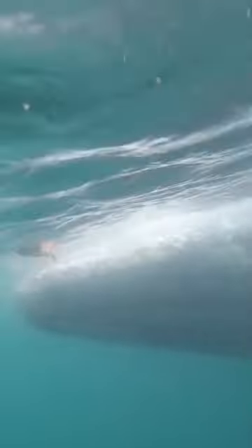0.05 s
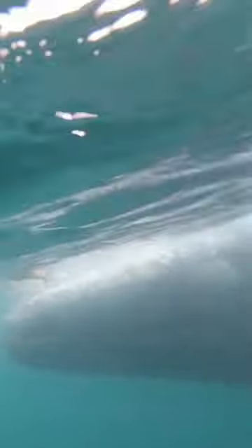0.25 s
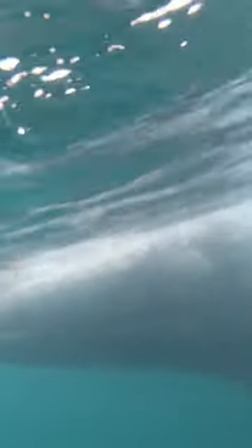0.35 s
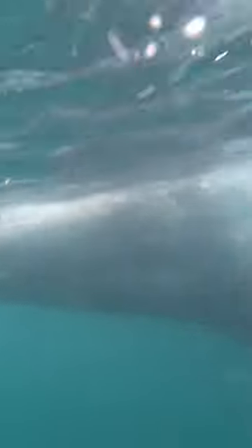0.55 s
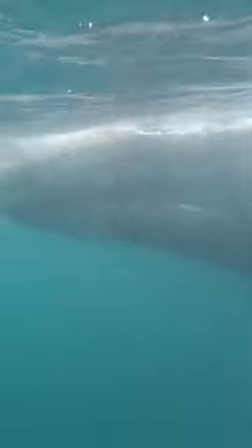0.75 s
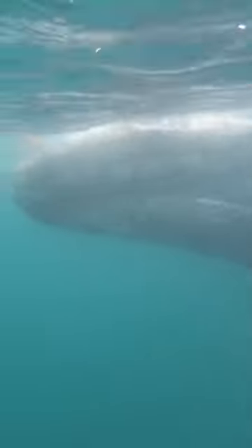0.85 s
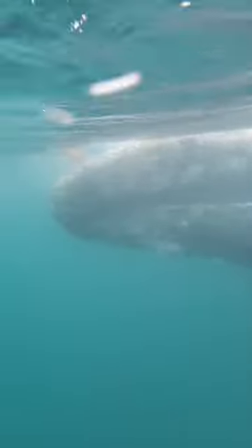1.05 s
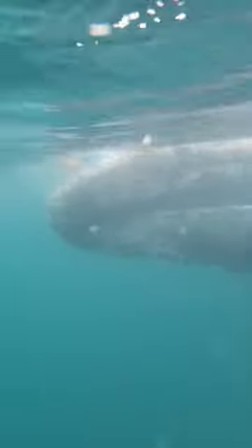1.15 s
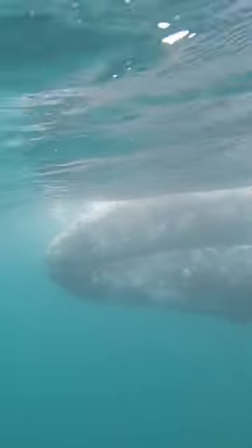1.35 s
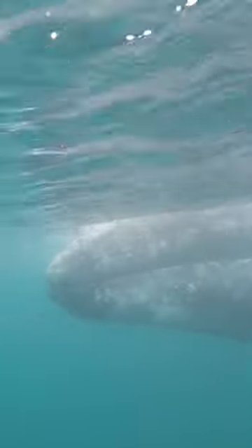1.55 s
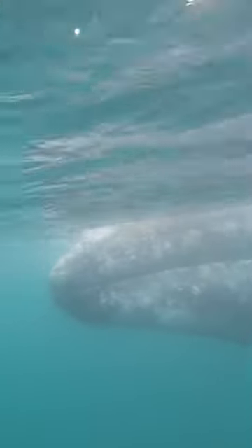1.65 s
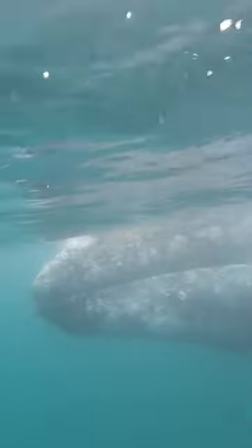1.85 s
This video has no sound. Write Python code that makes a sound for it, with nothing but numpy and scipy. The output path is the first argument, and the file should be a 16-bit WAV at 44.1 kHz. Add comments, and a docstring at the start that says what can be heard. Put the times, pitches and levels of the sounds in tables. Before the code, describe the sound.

Water gurgles and splashes against a sealed camera just below the sea surface. A faint low rumble opens; at 0.25 s a deep gulp drops in pitch. From 0.38 to 0.65 s a dense burst of bubbles pops, fizzes and crackles, with a rising bubble note. Sharp ticks follow at 0.8 and 0.9 s, among deep blubs until 1.3 s, then quiet muffled rumble with faint wash returning near 1.7 s.

```python
"""A low rumble and a muffled wash from the surface (shaped noise) surround a camera held just under the sea.
A wavelet closes over it: pockets of air gulp and wobble (fading sine tones that bend in pitch), small bubbles
ping, fizz and crackle (short tones and clicks) and leave a ringing cloud (noise in narrow resonances).
One large bubble rings on, mostly rising in pitch, while drops tick on the housing (clicks through its
resonances); a thin high sizzle (noise in narrow bands) surrounds two sharp ticks."""
import sys
import numpy as np
from scipy import signal
from scipy.fft import rfft, irfft
from scipy.io import wavfile
from scipy.ndimage import uniform_filter1d

SR = 44100
rng = np.random.default_rng(int(sys.argv[2]) if len(sys.argv) > 2 else 0)


def wav_record(signal):
    """Record a signal, one row per channel, as 16-bit PCM in the file named by sys.argv[1]."""
    frames = np.transpose(np.atleast_2d(signal))
    bounded = np.clip(frames, -1, 1)
    # unit amplitude maps onto the largest positive 16-bit level
    quanta = np.round(bounded * 32767).astype(np.int16)
    wavfile.write(sys.argv[1], SR, quanta)


N = 83790  # length in samples


def undb(db):
    """Turn decibels into a gain."""
    return 10 ** (np.asarray(db) / 20)


def unit(x):
    """Scale a sound to an average (rms) strength of 1."""
    return x / np.sqrt(np.mean(x ** 2))


def curve(rows, axis=1):
    """Join one column of a timed table by straight lines."""
    rows = np.array(rows)
    return np.interp(np.arange(N) / SR, rows[:, 0], rows[:, axis])


def colour(x, points):
    """Shape the spectrum through (Hz, dB) points, with no sound ahead of its cause (minimum phase)."""
    size = 2 * N
    points = np.array(points)
    hz = np.maximum(np.arange(size // 2 + 1) * SR / size, 1)
    db = np.interp(np.log(hz), np.log(points[:, 0]), points[:, 1])
    # fold the cepstrum onto positive times
    cepstrum = irfft(np.log(undb(db)))
    cepstrum[1:size // 2] *= 2
    cepstrum[size // 2 + 1:] = 0
    return irfft(rfft(x, size) * np.exp(rfft(cepstrum)))[:N]


def band(x, hz, width):
    """Pass a sound through one resonance with gain 1 at its centre."""
    g, k = np.tan(np.pi * hz / SR), width / hz
    top = [g * k, 0, -g * k]
    bottom = [1 + g * k + g * g, 2 * (g * g - 1), 1 - g * k + g * g]
    return signal.lfilter(top, bottom, x + 1e-18)


def walk(rate):
    """Slow random drift of spread 1, from random steps (rate per second) smoothed twice."""
    k = int(SR / rate)
    steps = np.repeat(rng.standard_normal(N // k + 1), k)
    smooth = uniform_filter1d(uniform_filter1d(steps, k), k)
    return unit(smooth[:N])


def add(out, start, sound):
    """Mix a sound in at its time."""
    i = int(start * SR)
    out[i:i + len(sound)] += sound[:N - i]


def ring(t, hz, t60, onset):
    """An air volume swells into pulsation and dies away, by 60 dB in t60 seconds."""
    tone = np.sin(2 * np.pi * np.cumsum(hz) / SR)
    swell = (1 - np.exp(-t / onset)) ** 2
    fade = np.exp(-np.log(1000) * t / t60)
    return tone * swell * fade


def gliding_bubbles(rows):
    """Each bubble or pocket rings at the pitch of its size and glides as it moves."""
    onset_cycles = 0.36
    out = np.zeros(N)
    for start, hz, db, t60, glide in rows:
        t = np.arange(int(2 * t60 * SR)) / SR
        pitch = hz * 2 ** (glide * t / t60)
        add(out, start, undb(db) * ring(t, pitch, t60, onset_cycles / hz))
    return out


def noise_bands(modes, level):
    """Noise through narrow resonances, each filtered twice, with a drawn loudness."""
    lines = np.zeros(N)
    for hz, width, db in modes:
        noise = rng.standard_normal(N)
        lines += undb(db) * unit(band(band(noise, hz, width), hz, 2 * width))
    return unit(lines) * undb(curve(level))


def water():
    """Flow rumbles and churns on the case; the surface washes and hisses above in uneven surges."""
    # Loudness of each layer. Each row: time in seconds, level in dB (wash and hiss: before surging).
    rumble_level = [(0, -32.5), (.12, -31.5), (0.229, -21.5), (.285, -32), (.32, -21.5), (.41, -20),
                    (.47, -28.5), (.52, -20.5), (.56, -20), (.68, -26), (.88, -23.5), (1.0, -26),
                    (1.131, -39.5), (1.27, -39), (1.4, -45), (1.65, -31.5), (1.9, -36)]
    churn_level = [(.17, -57), (.215, -35.5), (.27, -46.5), (.34, -31), (.40, -40.5), (.47, -19),
                   (.53, -37.5), (.65, -39.5), (0.679, -57.5), (.80, -77)]
    wash_level = [(0, -39.5), (.2, -50.5), (0.349, -58.5), (0.699, -51.5), (0.899, -58), (.96, -44),
                  (1.049, -53.5), (1.15, -54.5), (1.4, -53.5), (1.55, -49), (1.63, -45), (1.68, -41),
                  (1.71, -48.5), (1.80, -42.5), (1.87, -40), (1.9, -36)]
    hiss_level = [(0, -55), (0.199, -58.5), (.7, -67.5), (1.15, -72.5), (1.38, -71), (1.55, -66),
                  (1.64, -58), (1.70, -60.5), (1.75, -59.5), (1.83, -56.5), (1.9, -55.5)]
    # Balance of low and high sound in each layer. Each row: frequency in Hz, relative level in dB.
    rumble_colour = [(15, -1), (30, -2.5), (50, -1), (80, -6.5), (130, -2.5), (190, -13), (300, -28),
                     (600, -46), (2000, -76), (10000, -110)]
    churn_colour = [(90, -20), (170, -2), (250, 7.5), (330, 2.5), (430, -7.5), (600, -16), (800, -19.5),
                    (1000, -29), (2000, -46), (8000, -66.5)]
    wash_colour = [(100, 4.5), (260, -3), (370, -5), (480, 3), (720, -3), (900, -13.5), (1400, -19.5),
                   (1900, -31.5), (4000, -36), (10000, -81)]
    hiss_colour = [(500, -14), (1300, 4), (1900, 0), (2250, -0.5), (2500, 4), (2850, 2), (3300, -3.5),
                   (3800, -4.5), (5300, -9), (7000, -17.5), (10000, -26.5), (15000, -58.5)]
    surge_db, surges_per_s = 1.3, 20

    def flow(points, level):
        """Turbulent water as shaped noise."""
        return unit(colour(rng.standard_normal(N), points)) * undb(curve(level))

    wash = flow(wash_colour, wash_level) * undb(surge_db * walk(surges_per_s))
    hiss = flow(hiss_colour, hiss_level) * undb(surge_db * walk(surges_per_s))
    return flow(rumble_colour, rumble_level) + flow(churn_colour, churn_level) + wash + hiss


def sizzle():
    """A thin high sizzle around two sharp ticks: noise in narrow bands."""
    # Its narrow bands. Each row: centre in Hz, filter width in Hz, relative level in dB.
    modes = [(3280, 100, -2.5), (3950, 140, 3.5), (5200, 100, -7.5), (6030, 120, -8), (6660, 200, -3)]
    # Its loudness. Each row: time in seconds, level in dB.
    level = [(.78, -79), (.797, -50.5), (.81, -47), (.83, -64.5), (.88, -87), (0.905, -52), (.925, -81),
             (.96, -110)]
    return noise_bands(modes, level)


def housing(x):
    """The camera case rings in a few broad resonances."""
    # Ways the case vibrates. Each row: pitch in Hz, width in Hz of each of two filters, gain in dB.
    modes = [(845, 690, 8.5), (1440, 960, -5.5), (2340, 910, -0.5), (3520, 1100, 0), (5320, 1500, -6.5),
             (7050, 500, -14.5)]
    return sum(undb(db) * band(band(x, hz, width), hz, width) for hz, width, db in modes)


def ticks():
    """Drops strike sharply and leave the housing ringing briefly."""
    # Drops on the housing. Each row: start in seconds, peak level in dB before the treble cut, centre in Hz.
    drops = [(0.38, -31, 1290), (0.394, -36.5, 2500), (.4240, -22, 2940), (0.443, -27.5, 2000),
             (0.456, -26, 3000), (0.4655, -21.5, 4260), (.473, -24.5, 1400), (.478, -30, 3500),
             (0.481, -22, 1496), (.491, -26.5, 1810), (.502, -20, 2400), (.512, -34, 3500),
             (0.5274, -26.5, 2800), (0.5316, -31.5, 5200), (0.617, -31.5, 6000), (0.651, -40, 3400),
             (.747, -28.5, 700), (0.8065, -21, 3850), (0.835, -36, 3840), (.842, -38.5, 1790),
             (0.867, -44.5, 2500), (0.9017, -26, 5590), (0.93, -42, 1956), (1.034, -35, 1500),
             (1.044, -39, 3170)]
    ring_db, relative_width, top_hz = 13, 0.86, 7000
    out = np.zeros(N)
    for start, db, hz in drops:
        knock = band(signal.unit_impulse(SR // 20), hz, relative_width * hz)
        knock = knock + undb(ring_db) * housing(knock)
        add(out, start, undb(db) * knock / np.abs(knock).max())
    return signal.sosfilt(signal.butter(N=5, Wn=top_hz, fs=SR, output="sos"), out)


def crackle():
    """Countless tiny bursts of foam against the housing, made from random clicks."""
    # Loudness of the crackle. Each row: time in seconds, level in dB.
    level = [(.30, -90), (.37, -54), (.425, -30), (.47, -30), (.52, -31.5), (.57, -43), (.645, -49.5),
             (.70, -52.5), (.81, -48.5), (.88, -72), (1.03, -61), (1.12, -99.5)]
    # Its spectrum. Each row: frequency in Hz, relative level in dB.
    spectrum = [(80, -19), (250, -4), (500, 18), (900, 14), (1600, -4), (2300, -13.5), (3300, -8),
                (4700, -11), (6000, -19.5), (8000, -26.5), (10000, -32.5), (15000, -22.5)]
    bursts_per_s, spread_db = 700, 3.5
    sizes = undb(spread_db * np.minimum(rng.exponential(size=N), 4))
    happens = rng.random(N) < bursts_per_s / SR
    pops = happens * rng.choice([-1, 1], N) * sizes
    return unit(colour(pops, spectrum)) * undb(curve(level))


def ringing_cloud():
    """The cloud of bubbles left by the splash is kept ringing by countless small jolts, here noise."""
    # The cloud's resonances. Each row: pitch in Hz, filter width in Hz, relative level in dB.
    modes = [(792, 120, -1.5), (1303, 70, 4.5), (1586, 57, -1), (1740, 60, -7), (2793, 21, -7.5),
             (2890, 64, -12), (4250, 30, -10)]
    # Its loudness. Each row: time in seconds, level in dB.
    level = [(0.381, -78), (.425, -40.5), (.50, -34), (.56, -48), (.61, -39.5), (.63, -52.5), (.645, -38),
             (0.679, -55), (.75, -62.5), (.80, -81)]
    return noise_bands(modes, level)


def fizz():
    """A swarm of faint bubbles of all sizes; the small ones are more numerous and die sooner."""
    # Loudness of the swarm. Each row: time in seconds, level in dB.
    level = [(.28, -90), (.32, -45.5), (.37, -45.5), (.425, -27.5), (.47, -32), (.52, -31), (.57, -38),
             (.645, -42.5), (.69, -60), (.79, -55), (.88, -59), (1.06, -57), (1.13, -82.5)]
    # Its spectrum. Each row: frequency in Hz, relative level in dB.
    spectrum = [(60, -19), (200, 4), (330, -1), (700, 11), (1000, -8), (1450, -2), (2300, -4.5), (2900, -4),
                (3400, -2), (4200, -10.5), (5300, -25.5), (7000, -26), (10000, -58.5)]
    bubbles_per_s, low_hz, high_hz = 1100, 291.7, 6180
    fade_cycles, spread_db, max_glide = 55, 4.5, 0.04  # glide in octaves per t60
    size, strength, life, drift, when = rng.random((int(bubbles_per_s * N / SR), 5)).T
    hz = low_hz * (high_hz / low_hz) ** np.sqrt(size)  # the root favours high pitches
    db = -spread_db * np.log(np.maximum(strength, .03))
    t60 = fade_cycles * (.5 + life) / hz
    glide = max_glide * (2 * drift - 1)
    swarm = gliding_bubbles(zip(when * N / SR, hz, db, t60, glide))
    return unit(colour(swarm, spectrum)) * undb(curve(level))


def scatter(x):
    """The bubbly water around adds a short fading tail of echoes."""
    tail_db, tail_t60_s = -11.5, .06
    t = np.arange(SR // 2) / SR
    tail = rng.standard_normal(len(t)) * np.exp(-np.log(1000) * t / tail_t60_s)
    return x + undb(tail_db) * signal.fftconvolve(x, tail / np.linalg.norm(tail))[:N]


def pings():
    """Small bubbles snap or swell into ringing as they pinch off."""
    # Single small bubbles. Each row: start in seconds, pitch in Hz, peak level in dB,
    # fade time t60 in seconds, glide in octaves per t60, swell time in seconds.
    small_bubbles = [(.236, 511, -22, 0.056, 0.028, 0.021), (0.254, 2900, -45.5, .015, 0, .001),
                     (.2535, 1055, -20, 0.035, 0, 0.001), (.258, 548, -23.5, 0.049, -0.038, .002),
                     (0.328, 4370, -37, 0.0049, 0.22, .0006), (0.343, 4600, -47, 0.021, 0, 0.0011),
                     (.359, 2426, -46.5, .02, 0, .002), (.369, 2206, -37.5, 0.026, 0.011, 0.0016),
                     (.377, 2390, -36, .02, 0, .001), (.383, 2038, -27.5, 0.0081, -0.036, .0005),
                     (0.3942, 3205, -33, .012, 0, .0006), (0.3817, 1150, -12.5, 0.0034, -.04, 0.00019),
                     (0.3861, 1553, -28.5, 0.031, .05, 0.0013), (0.3942, 1330, -22, 0.0088, -0.11, .0006),
                     (.404, 4940, -37.5, 0.023, -0.19, 0.0023), (0.4142, 340.5, -16, 0.059, .1, 0.00094),
                     (.413, 2990, -33, 0.0068, 0, 0.00051), (.414, 4970, -36.5, .01, 0.016, 0.0008),
                     (0.4146, 1008, -11, 0.028, 0.067, 0.0018), (.4196, 609, -10, 0.021, 0.068, 0.00037),
                     (0.4196, 1496, -17, .028, 0.055, .001), (0.4226, 4650, -19.5, .007, 0, 0.00053),
                     (.4252, 4100, -20.5, .011, -0.23, 0.0013), (.429, 1810, -23, 0.015, -0.02, .001),
                     (0.4344, 4930, -24, .007, .1, .001), (.4362, 3225, -26.5, .0053, 0, .0004),
                     (0.4425, 407, -21, .25, 0.17, 0.0015), (0.4423, 1587, -20, .03, -0.07, .0003),
                     (0.445, 4130, -15, 0.0044, 0.13, .001), (.447, 4290, -17, .008, 0.17, 0.0011),
                     (0.453, 4670, -22.5, 0.0059, 0.13, .0015), (0.4564, 5226, -28.5, 0.0045, 0.23, .001),
                     (0.453, 1312, -33, 0.095, 0.026, .004), (0.4652, 6020, -30.5, 0.0062, -0.22, .0008),
                     (0.4715, 1240, -23, 0.0087, 0, 0.00058), (0.4803, 1010, -22.5, 0.014, 0, .0005),
                     (.4905, 3200, -30, 0.011, 0.01, 0.0011), (0.493, 5130, -31, 0.02, 0, .0015),
                     (.495, 4230, -28.5, 0.015, -0.2, .0015), (0.5017, 1827, -10.5, .02, -0.12, 0.00033),
                     (0.501, 910, -18.5, 0.024, 0.029, 0.00035), (.5132, 792, -12, 0.015, .09, 0.00065),
                     (0.5197, 1800, -31, 0.0039, .07, 0.00052), (0.535, 1516, -16, 0.0078, .05, 0.00084),
                     (.536, 2843, -37, .04, 0.021, 0.0016), (0.5403, 5120, -30.5, 0.0048, -.1, 0.0016),
                     (0.5437, 4090, -25, 0.011, -0.13, .002), (0.5484, 2920, -18.5, 0.0063, -0.06, 0.00052),
                     (.551, 1338, -18, 0.024, 0.14, 0.00075), (.552, 1620, -25.5, 0.026, 0.049, 0.00087),
                     (.554, 2730, -36, 0.068, -0.015, 0.0025), (.556, 3600, -37, 0.023, 0.15, 0.0028),
                     (.556, 725, -36.5, .25, 0.27, 0.0025), (0.57, 1213, -37, 0.043, 0.12, 0.0018),
                     (.591, 1513, -22.5, 0.023, 0.24, 0.00092), (0.592, 2200, -36, 0.015, -0.23, 0.0011),
                     (.592, 2800, -36.5, .1, -0.0043, 0.0017), (.599, 2960, -32.5, 0.018, 0.12, .003),
                     (0.601, 1400, -29, 0.01, -0.12, 0.0013), (0.615, 1920, -34.5, 0.015, 0.16, 0.0013),
                     (.635, 1297, -35.5, 0.037, 0.023, 0.0032), (.638, 1710, -40, .04, 0, 0.0022),
                     (0.64, 4000, -36.5, 0.013, -.1, 0.003), (0.642, 2720, -33.5, .02, 0.14, 0.001),
                     (0.6487, 3350, -25, 0.003, .03, .001), (.719, 2900, -51.5, 0.016, -.1, 0.0033),
                     (.748, 1433, -26, 0.049, 0.02, 0.0011), (0.749, 1805, -37.5, 0.026, -0.018, .001),
                     (.750, 3960, -42.5, 0.011, 0.018, .0015), (.768, 1450, -43, .04, 0.013, .004),
                     (.7795, 2430, -43, .025, -.05, .002), (0.8061, 903, -19, 0.0064, -0.25, 0.00028),
                     (0.8331, 2140, -34, .007, -.1, .0005), (0.868, 2580, -43, 0.011, 0, .001),
                     (.901, 5760, -33, 0.0053, 0.0087, .0008), (1.034, 2200, -45, .007, -.1, .0006),
                     (1.042, 2500, -44, .006, 0, .0005), (1.0415, 4080, -46, 0.01, 0.04, 0.00042),
                     (1.058, 596, -44.5, 0.075, 0.059, 0.0011), (1.251, 1110, -56, 0.017, 0, 0.00057),
                     (1.365, 1420, -57.5, 0.011, 0.04, 0.0043), (1.413, 1385, -49.5, 0.017, 0.011, 0.0035),
                     (1.502, 1370, -51, 0.0087, -0.041, 0.0033), (1.540, 1385, -46.5, 0.016, 0.073, .004),
                     (1.862, 2460, -48.5, 0.033, 0.051, .005)]
    out = np.zeros(N)
    for start, hz, db, t60, glide, swell in small_bubbles:
        t = np.arange(int(2 * t60 * SR)) / SR
        ping = ring(t, hz * 2 ** (glide * t / t60), t60, swell)
        add(out, start, undb(db) * ping / np.abs(ping).max())
    return out


def rising_bubble():
    """One large bubble, jostled by the splash, sharpens as it nears the surface."""
    # Its path. Each row: time in seconds, pitch in Hz before jitter, level in dB before lift and wobble.
    path = [(.484, 531.6, -32), (.492, 523.6, -17), (.510, 516.5, -24.5), (.523, 530.3, -13),
            (.541, 549, -31.5), (.550, 556.5, -21), (.568, 547, -21.5), (.594, 551, -23.5),
            (.624, 565, -38), (.635, 583.5, -22), (.658, 597, -31.5), (.690, 630, -56.5)]
    lift_db, wobble_db, jitter = 0.5, 3.5, 0.017  # jitter as a fraction of the pitch
    hz = curve(path) * (1 + jitter * walk(90))
    db = curve(path, axis=2) + lift_db + wobble_db * walk(120)
    t = np.arange(N) / SR
    sounding = (t > path[0][0]) * (t < path[-1][0])
    return np.sqrt(2) * np.sin(2 * np.pi * np.cumsum(hz) / SR) * undb(db) * sounding


def air_pockets():
    """Large pockets of air wobble against the housing, each a low gliding note."""
    # The pockets. Each row: start in seconds, pitch in Hz, level in dB before swell and fade,
    # fade time t60 in seconds, glide in octaves per t60.
    pockets = [(.04, 288, -35, 0.36, -0.11), (.190, 83, -8.5, 0.12, -0.27), (.214, 45, -7.5, .13, 0),
               (.2555, 159, -5, 0.046, -0.046), (.207, 252.6, -19.5, 0.094, 0.22),
               (.318, 109.3, -40.5, 0.048, 0.068), (.340, 297, -24, 0.068, 0.09),
               (.361, 217.7, 0, 0.043, 0.41), (.390, 172.4, -10, 0.15, 0.044),
               (.398, 95.4, 3.5, 0.048, 0.19), (.410, 168, -2, 0.094, 0), (.420, 87, -6, 0.13, 0),
               (.4395, 186, -5, 0.23, 0.28), (.455, 230.8, -2, 0.052, -0.093),
               (.474, 183, -11.5, .07, -0.19), (.448, 108.4, -7, .12, .2), (.457, 119.7, -1, .18, 0.032),
               (.478, 135, -9, .08, .2), (.572, 100, -14.5, 0.16, 0.073), (.652, 82.5, 1.5, 0.055, 0.086),
               (.686, 97.2, 2.5, 0.041, -0.035), (.761, 75.5, -10, 0.71, -0.18),
               (.802, 125.6, -4, 0.052, 0.16), (.862, 64, 2.5, 0.059, 0.043),
               (.934, 135.4, -3, 0.1, -0.022), (.970, 133.2, -3, 0.1, 0.24),
               (1.012, 127.4, -9.5, 0.14, 0.1), (1.214, 55.2, -7.5, 0.15, 0.4),
               (1.260, 119.7, -22, 0.084, 0.16), (1.290, 69.4, -11.5, 0.081, 0.012),
               (1.386, 123, -23, 0.14, 0.064), (1.582, 76.5, -23, 0.53, -0.067),
               (1.608, 122, -33, 0.15, -0.13), (1.752, 119.5, -20, 0.11, 0.3)]
    return gliding_bubbles(pockets)


def gulps():
    """Air is gulped under: a cavity closes and its note drops within a few cycles."""
    # The gulps. Each row: start in seconds, first pitch in Hz, last pitch in Hz,
    # level in dB before swell and fade, fade time t60 in seconds.
    cavities = [(0.254, 472, 232.5, 3, 0.032), (0.3794, 520, 238.2, 1, 0.063),
                (0.9339, 530, 172, -7.5, 0.019)]
    fall_s, onset_s = 0.0025, 0.0011
    out = np.zeros(N)
    for start, first_hz, last_hz, db, t60 in cavities:
        t = np.arange(int(2 * t60 * SR)) / SR
        hz = last_hz + (first_hz - last_hz) * np.exp(-t / fall_s)
        add(out, start, undb(db) * ring(t, hz, t60, onset_s))
    return out


def scene():
    """All the sounds meet at one microphone."""
    large = gulps() + air_pockets() + rising_bubble()
    small = scatter(pings()) + fizz() + ringing_cloud()
    sharp = ticks() + sizzle()
    return (water() + crackle() + large + small + sharp)[None]


def record(dry):
    """The sealed case muffles the treble; the recorder cuts the top."""
    case_colour = [(5500, -2.0), (7500, -1), (10000, -2.5), (15000, -19.5)]  # Hz, dB
    top_hz = 15800
    muffled = colour(dry[0], case_colour)
    return signal.sosfilt(signal.ellip(8, .2, 70, top_hz, fs=SR, output="sos"), muffled)[None]


dry = scene()
out = record(dry)
wav_record(out)
```